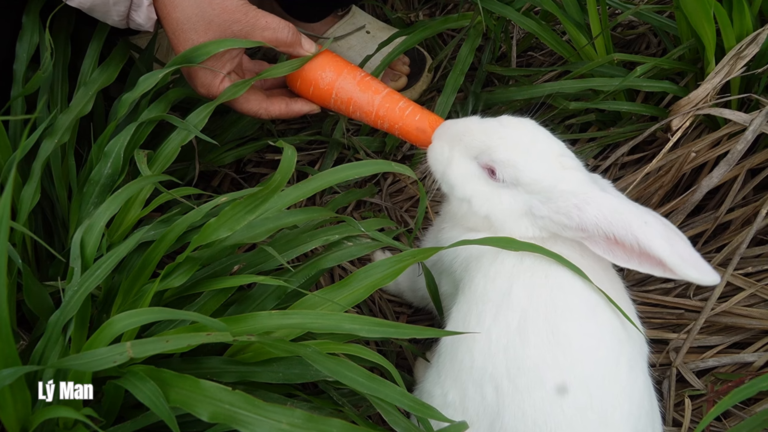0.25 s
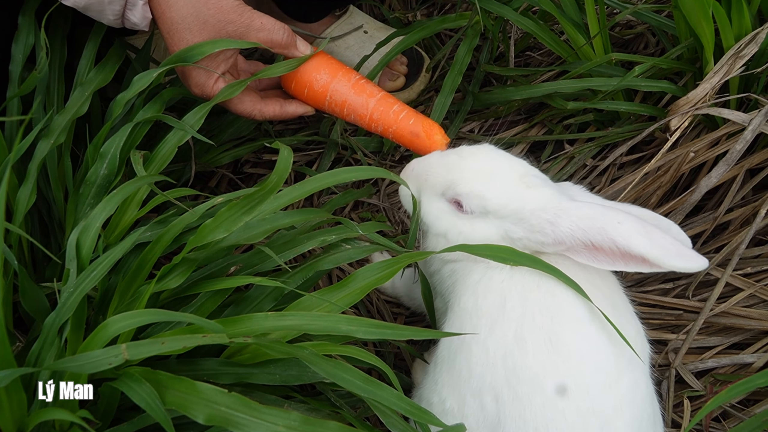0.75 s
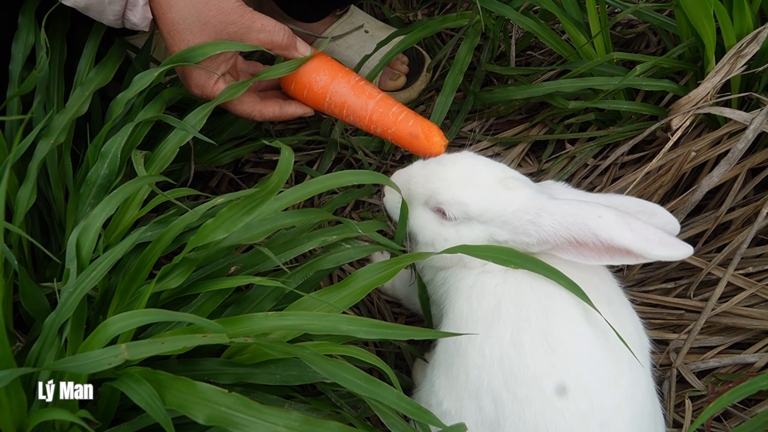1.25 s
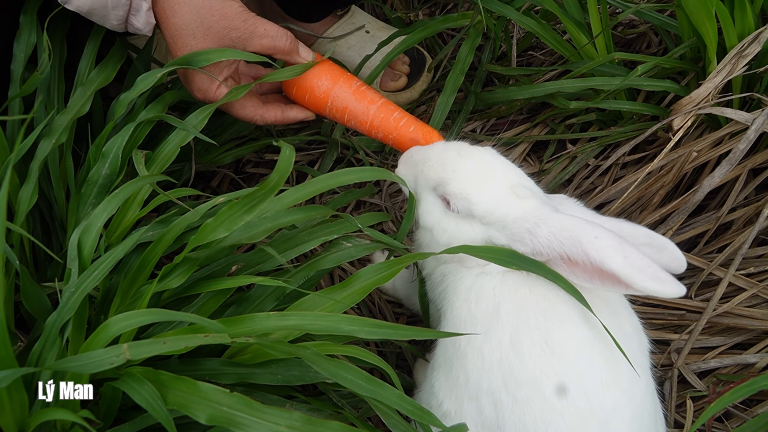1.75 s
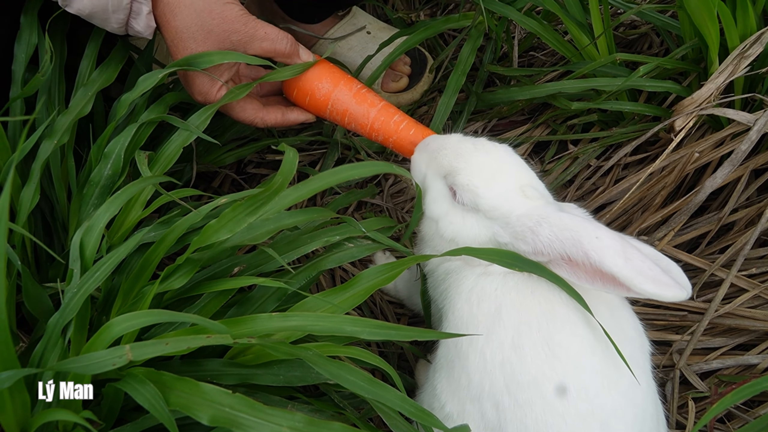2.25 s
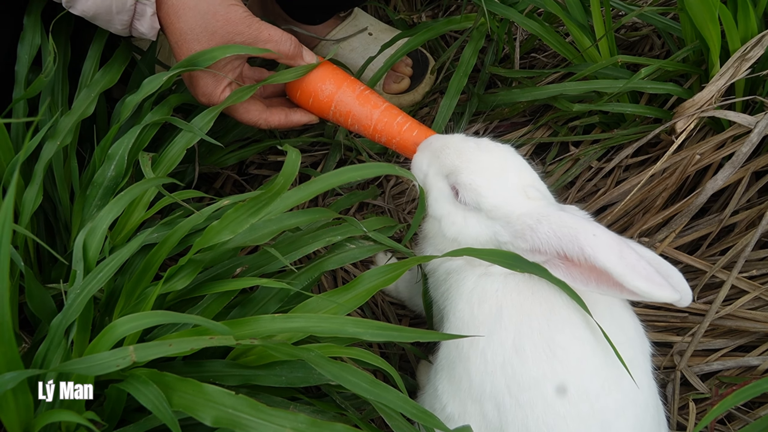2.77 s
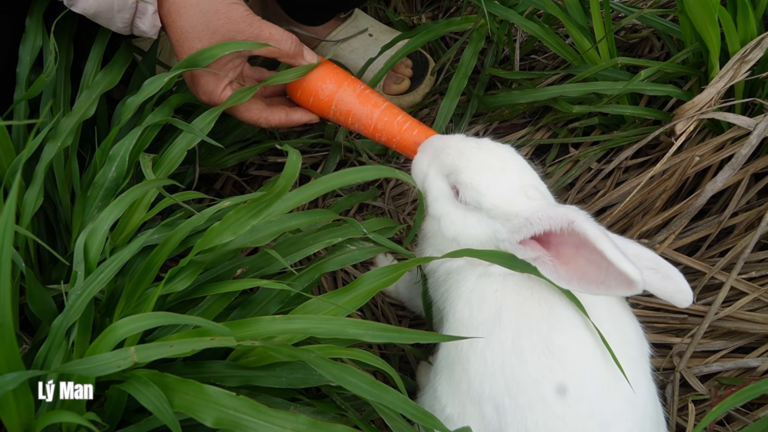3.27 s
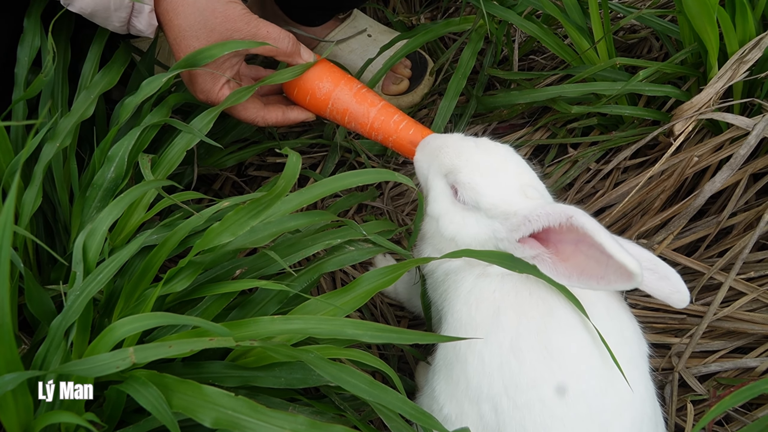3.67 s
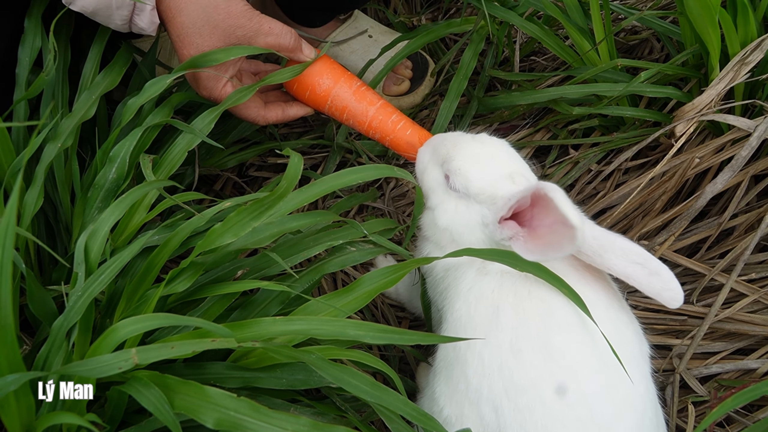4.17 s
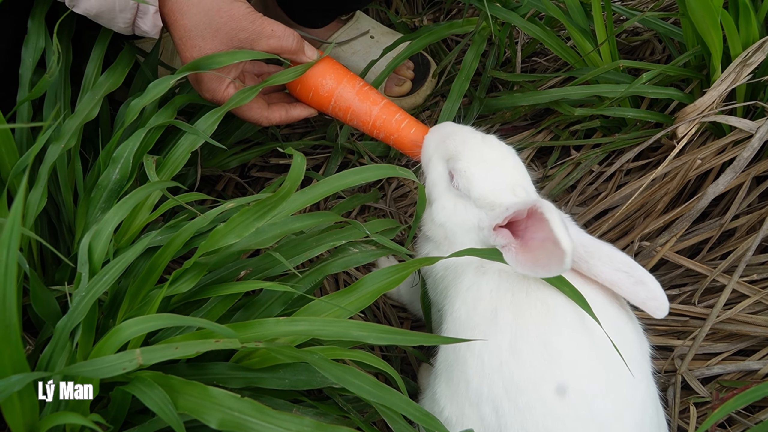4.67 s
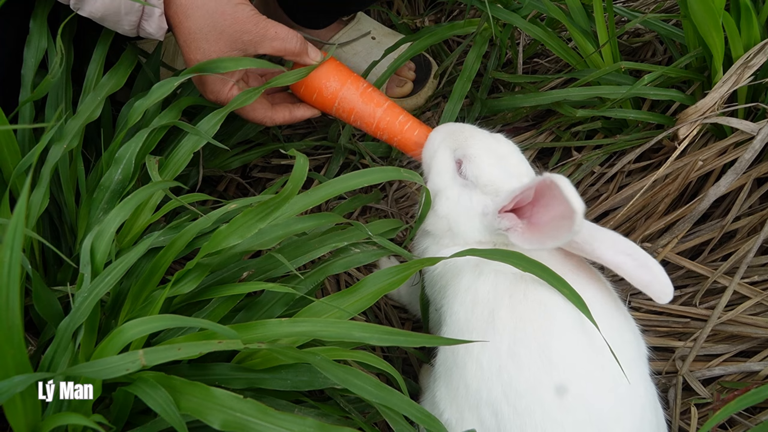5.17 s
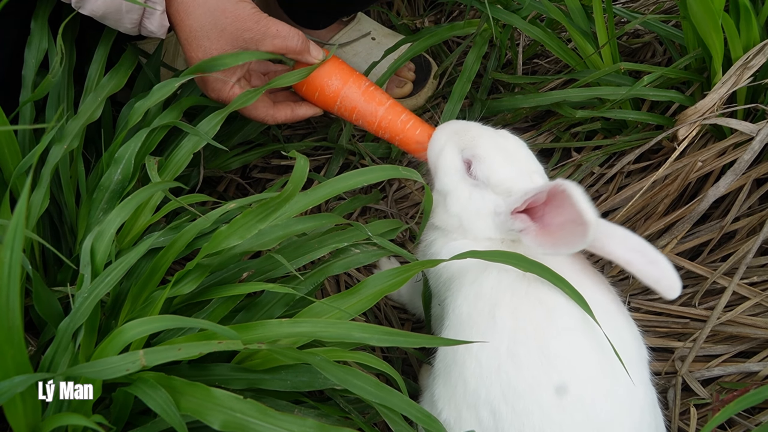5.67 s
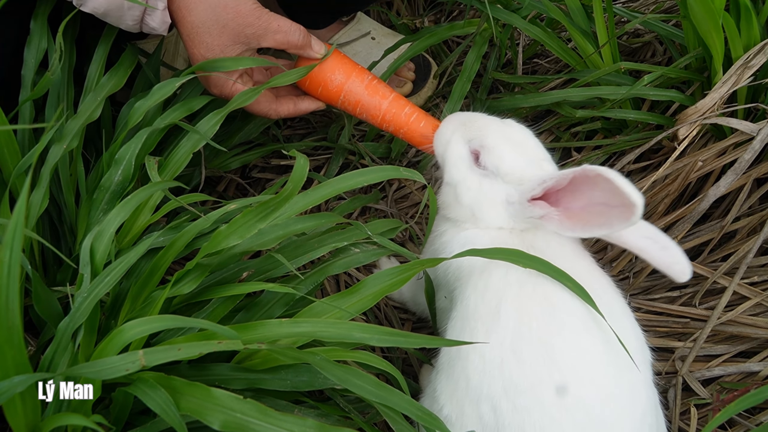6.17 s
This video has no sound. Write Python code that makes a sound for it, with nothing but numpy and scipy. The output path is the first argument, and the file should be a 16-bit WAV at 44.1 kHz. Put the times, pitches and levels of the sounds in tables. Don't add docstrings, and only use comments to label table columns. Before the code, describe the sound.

A constant hiss of distant running water and foliage fills a grassy clearing. One small bird repeats short sagging whistles while another answers with quick rising ones; a far bird slides downward. Two dull wooden knocks ring behind trees midway, beside a nearer swooping whistle. Later, dry straw ticks close by and a rabbit bites a carrot in tiny bright crackles. Narrow stereo microphones, thin in the bass.

```python
import sys
import numpy as np
from scipy import signal
from scipy.fft import rfft, irfft
from scipy.io import wavfile

SR = 44100
rng = np.random.default_rng(int(sys.argv[2]) if len(sys.argv) > 2 else 0)


def materialize(psi):
    bounded = np.clip(np.atleast_2d(psi).T, -1, 1)
    quanta = np.round(bounded * 32767).astype(np.int16)
    wavfile.write(sys.argv[1], SR, quanta)


def field_ratio(decibels):
    return 10 ** (np.asarray(decibels, dtype=float) / 20)


N = 283122
ATTACK_S, RELEASE_S = 0.005, 0.012


def rms_one(x):
    return x / np.sqrt(np.mean(x ** 2) + 1e-20)


def at_hz(points, hz):
    table_hz, table_db = np.array(points).T
    return np.interp(np.log(np.maximum(hz, 1)), np.log(table_hz), table_db)


def drift(rate, size):
    r = np.exp(-2 * np.pi * rate / SR)
    noise = rng.standard_normal((size, N + SR))
    slow = signal.lfilter([1], [1, -2 * r, r * r], noise)[:, SR:]
    return slow / slow.std(axis=1, keepdims=True)


def add(track, s, sound):
    i = round(s * SR)
    track[i:i + len(sound)] += sound[:N - i]


def placed(x, lead_us, pan_db):
    turn = np.exp(1j * np.pi * np.fft.rfftfreq(N, 1 / SR) * lead_us * 1e-6)
    both = irfft(rfft(x) * np.array([turn, np.conj(turn)]), N)
    return both * field_ratio(np.array([[pan_db], [-pan_db]]) / 2)


def band_pass(order, low_hz, high_hz):
    return signal.butter(order, [low_hz, high_hz], "band", fs=SR, output="sos")


def dying_noise(t60, attack_s):
    t = np.arange(SR // 3) / SR
    return rng.standard_normal(len(t)) * field_ratio(-60 * t / t60) * np.minimum(t / attack_s, 1)


def seconds(length):
    return np.arange(int(length * SR)) / SR


def bird(notes, flutter_db):
    out = np.zeros(N)
    for s, pitch_hz, level_db in notes:
        t = np.arange(len(pitch_hz)) / SR
        edges = np.minimum(1, np.minimum(t / ATTACK_S, t[::-1] / RELEASE_S))
        tone = np.sin(2 * np.pi * np.cumsum(pitch_hz) / SR)
        add(out, s, np.sqrt(2) * edges * field_ratio(level_db) * tone)
    return out * field_ratio(flutter_db * drift(100.0, size=1)[0])


def fall_note(s, hold, sag, db, goal_hz):
    from_hz, sag_s, sag_loss_db, fade_db_per_s = 3520, 0.038, -2, -45
    late = np.maximum(seconds(hold + sag) - hold, 0)
    hz = goal_hz + (from_hz - goal_hz) * np.exp(-late / sag_s)
    level_db = db + sag_loss_db * np.minimum(late / ATTACK_S, 1) + fade_db_per_s * late
    return s, hz, level_db


def falling_bird():
    # start in seconds, hold in seconds, sag in seconds, level in dB, pitch sagged towards in Hz.
    fall_notes = [(.11, .025, .05, -45, 2350), (.548, .015, .095, -45, 2650),
                  (.958, .014, .09, -48.5, 2400), (1.42, .02, .06, -56, 2450),
                  (3.362, .021, .05, -45.5, 2400), (3.77, .025, .045, -44, 2400),
                  (4.25, .028, .048, -44, 2250), (4.685, .014, .07, -46, 2550),
                  (5.12, .023, .052, -46.5, 2400), (5.523, .013, .095, -44.5, 2700),
                  (5.998, .014, .055, -48.5, 2700)]
    return bird([fall_note(*row) for row in fall_notes], flutter_db=2.5)


def rise_note(s, climb, top_hz, db, swell_db):
    from_hz, bend, hold_share = 3600, 1.3, 0.75
    dip_db, top_loss_db = -2.5, -1.5
    up = np.minimum(seconds(climb * (1 + hold_share)) / climb, 1)
    hz = from_hz + (top_hz - from_hz) * up ** bend
    level_db = db + (swell_db + top_loss_db) * up + dip_db * np.sin(np.pi * up ** 2)
    return s, hz, level_db


def rising_bird():
    # start in seconds, climb in seconds, top in Hz, level in dB, swell in dB.
    rise_notes = [(.392, .031, 5400, -49, -6), (.808, .029, 5400, -48, 3), (1.25, .028, 5450, -50, -2),
                  (1.69, .028, 5400, -55, -2), (3.215, .025, 5400, -57, 0), (3.615, .025, 5500, -50, 2),
                  (4.098, .024, 5750, -55, 8), (4.525, .033, 5620, -46, -11), (4.97, .031, 5400, -48, -12),
                  (5.37, .041, 5300, -53, -2), (5.84, .029, 5560, -53, 0), (6.3, .038, 5400, -45, -7)]
    return bird([rise_note(*row) for row in rise_notes], flutter_db=2.8)


def swoop_note(s, at, break_hz, db, swell_db):
    from_hz, fall_hz_per_s = 4850, 8800
    late_s, late_hz_per_s = 0.042, 4500
    break_s, dip_db_per_khz = 0.005, -22
    t = seconds(at + late_s)
    step = np.tanh((t - at) / break_s)
    hz = from_hz - fall_hz_per_s * t - break_hz * (1 + step) / 2
    hz = hz - late_hz_per_s * np.maximum(t - at, 0)
    level_db = db + swell_db * t / t[-1] + dip_db_per_khz * break_hz / 1000 * (1 - step ** 2)
    return s, hz, level_db


def swooping_bird():
    # start in seconds, time to the break in seconds, break in Hz, level in dB, swell in dB.
    swoop_notes = [
        (2.493, .049, 420, -47.5, 7),
        (2.859, .07, 150, -55, 20),
    ]
    return bird([swoop_note(*row) for row in swoop_notes], flutter_db=3.0)


def slide_note(s, length, start_hz, db):
    return s, start_hz - 18000 * seconds(length), db


def sliding_bird():
    # start in seconds, length in seconds, starting pitch in Hz, level in dB.
    slide_notes = [
        (.915, .05, 4250, -57),
        (2.575, .045, 3150, -51),
        (3.245, .085, 5300, -55),
        (3.435, .08, 5300, -55),
        (3.608, .085, 5400, -56),
        (3.79, .08, 5300, -54),
        (3.972, .08, 5300, -56),
        (4.16, .09, 5550, -57),
        (4.39, .1, 5050, -58),
    ]
    return bird([slide_note(*row) for row in slide_notes], flutter_db=2.2)


def slope_echo(x):
    delay_s, echo_db = 0.02, -7.5
    return field_ratio(echo_db) * np.roll(x, int(delay_s * SR)) * drift(90.0, size=1)[0]


def nibbles():
    # start in seconds, peak in dB, t60 in seconds, low band edge in Hz.
    cracks = [(3.639, -40, .012, 9000), (4.814, -35, .022, 7000), (5.029, -50, .02, 9000),
              (5.043, -46, .04, 14000), (5.090, -36, .022, 7000), (5.293, -46, .02, 8000),
              (5.313, -46, .015, 9000), (5.330, -40, .02, 9000), (5.339, -36.5, .025, 6500),
              (5.353, -46, .02, 8000), (5.3697, -24, .004, 4000), (5.3706, -27, .018, 4500),
              (5.578, -46, .05, 13500), (5.614, -39.5, .02, 7500)]
    out = np.zeros(N)
    for s, db, t60, low_hz in cracks:
        burst = dying_noise(t60, attack_s=0.00024)
        crack = signal.sosfilt(band_pass(1, low_hz, 15200), burst)
        add(out, s, field_ratio(db) * crack / np.abs(crack).max())
    push = np.hanning(int(0.0061 * SR))
    add(out, 5.3697, field_ratio(-75) * push)
    return out


def straw():
    # start in seconds, peak in dB.
    ticks = [
        (.033, -43),
        (3.226, -46.5),
        (3.922, -39),
        (3.999, -45),
        (4.22, -47),
        (4.32, -41),
        (4.485, -47),
        (4.667, -37),
        (4.737, -42),
        (5.166, -45),
    ]
    out, band = np.zeros(N), band_pass(2, 4300, 8200)
    for s, db in ticks:
        tick = signal.sosfilt(band, dying_noise(0.022, attack_s=0.0005))
        add(out, s, field_ratio(db) * tick / np.abs(tick).max())
    return out


def knocks():
    # start in seconds, level in dB, t60 in seconds, brightness above 4 kHz in dB.
    blows = [
        (2.205, -46, 0.28, -22),
        (2.577, -42.5, 0.27, -18),
    ]
    # centre in Hz, width in Hz, level in dB.
    body_modes = [(1190, 200, 7), (1510, 350, -1), (2080, 350, 1), (2670, 840, 3)]
    out = np.zeros(N)
    body_band = signal.butter(3, 900, "high", fs=SR, output="sos")
    for s, db, t60, bright_db in blows:
        burst = signal.sosfilt(body_band, dying_noise(t60, attack_s=0.0065))
        sound = field_ratio(bright_db) * signal.sosfilt(band_pass(2, 4500, 7000), burst)
        for hz, width, peak_db in body_modes:
            mode = signal.butter(2, [hz - width / 2, hz + width / 2], "band", fs=SR)
            sound += field_ratio(peak_db) * signal.lfilter(*mode, burst)
        add(out, s, field_ratio(db + 12.5) * sound)
    return out


def trees(x):
    t60_s, tail_db = 0.46, -6.5
    tails = np.array([dying_noise(t60_s, attack_s=0.0035) for path in range(4)])
    tails = tails / np.linalg.norm(tails)
    paths = signal.fftconvolve(x[None], tails, axes=1)[:, :N] * drift(42.0, size=4)
    shared = paths.sum(axis=0)
    own = paths[::2].sum(axis=0) - paths[1::2].sum(axis=0)
    return field_ratio(tail_db) * np.array([shared + 0.32 * own, shared - 0.45 * own])


def hiss():
    # time in seconds, level in dB.
    level_points = [(0.0, -43.5), (1.6, -44), (2.5, -44), (5.6, -43.5), (6.42, -44.3)]
    # frequency in Hz, spectral density in dB per Hz.
    front_points = [(15, -87), (25, -57), (64, -47), (99, -42), (179, -32.5), (307, -20), (413, -11.5),
                    (526, -9), (707, -3.5), (1310, -1), (1870, -1.5), (2020, -2), (3120, -3), (6110, -11),
                    (15700, -26.5)]
    # frequency in Hz, side minus mid in dB.
    width_points = [(60, -22), (200, -23), (400, -22), (700, -22), (1100, -25.5), (1700, -21.5),
                    (2300, -20.5), (2900, -16.5), (4400, -13.5), (6000, -13), (8000, -13.5), (11000, -10.5),
                    (15000, -8.5)]
    hz = np.fft.rfftfreq(N, 1 / SR)
    mid, side = rfft(rng.standard_normal((2, N))) * field_ratio(at_hz(front_points, hz))

    low = 1 / (1 + (hz / 1500) ** 2)
    high = 1 / (1 + (6000 / (hz + 1)) ** 2)
    breath = field_ratio(0.13 * drift(2.5, size=3) + 0.36 * drift(28.0, size=1))
    front = (irfft(mid * [low, 1 - low - high, high], N) * breath).sum(axis=0)

    band = np.digitize(hz, np.geomspace(250, 2500, 11))
    patch_db = np.r_[np.full(11, 4.5), 1.2][:, None] * drift(9.6, size=12)
    side = side * field_ratio(at_hz(width_points, hz)) * (band == np.arange(12)[:, None])
    apart = (irfft(side, N) * field_ratio(patch_db - 1.0)).sum(axis=0)

    level = field_ratio(np.interp(np.arange(N) / SR, *np.transpose(level_points)) + 2.5)
    ports = rms_one(np.array([front + apart, front - apart]))
    return level * ports * field_ratio(np.array([[0.1], [-0.1]]))


def scene():
    fall, rise, swoop, slide = falling_bird(), rising_bird(), swooping_bird(), sliding_bird()
    birds = placed(fall, 28, 0.6) + placed(rise, -16, 1.6)
    birds = birds + placed(swoop + slope_echo(swoop), 34, 0.6) + placed(slide, 30, 0.6)
    near = placed(nibbles(), 9.5, 2.7) + placed(straw(), 32, 0.3)
    knock = knocks()
    tail = trees(fall + rise + swoop + slide + knock)
    return hiss() + birds + tail + placed(knock, 55, 0.3) + near


def top_cut(x):
    return signal.sosfilt(signal.butter(12, 16660, fs=SR, output="sos"), x)


def record(dry):
    top_hz = 15790
    hz = np.fft.rfftfreq(N, 1 / SR)
    mix = irfft(rfft(dry) * (hz < top_hz), N)
    return top_cut(mix)


dry = scene()
out = record(dry)
materialize(out)
```